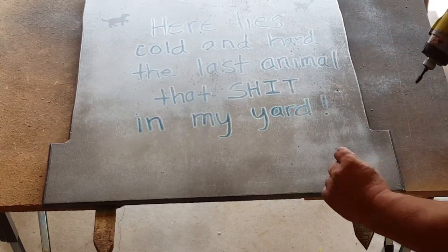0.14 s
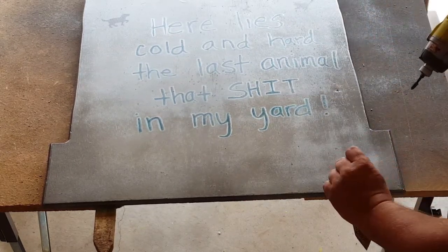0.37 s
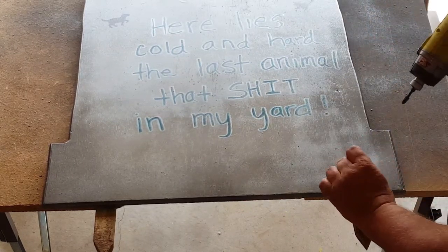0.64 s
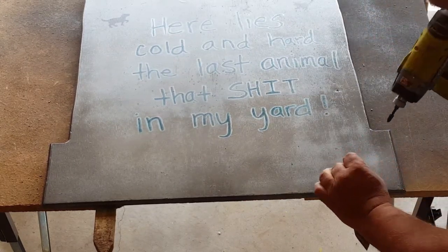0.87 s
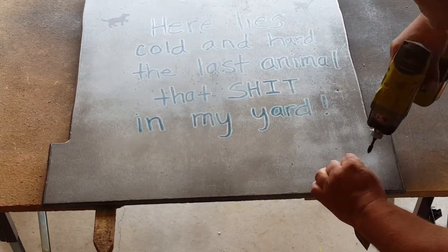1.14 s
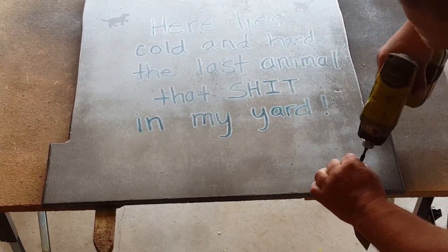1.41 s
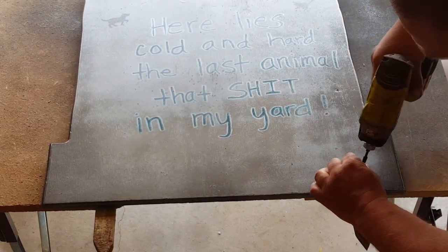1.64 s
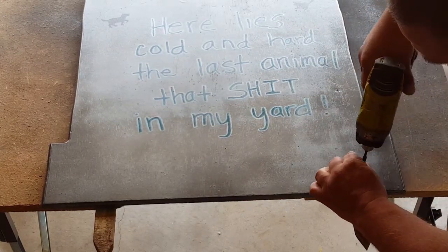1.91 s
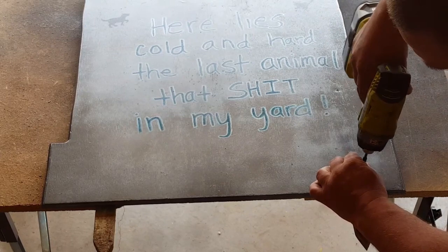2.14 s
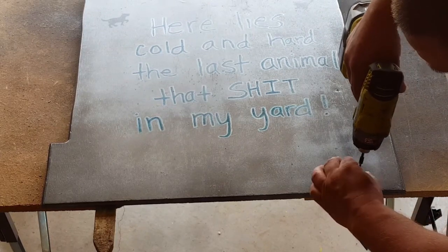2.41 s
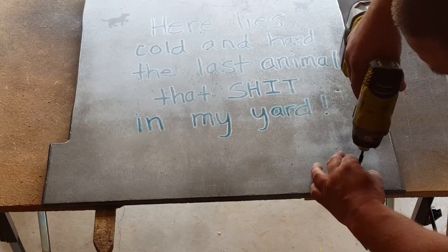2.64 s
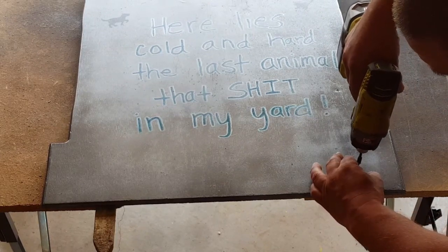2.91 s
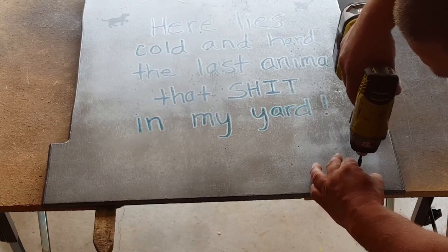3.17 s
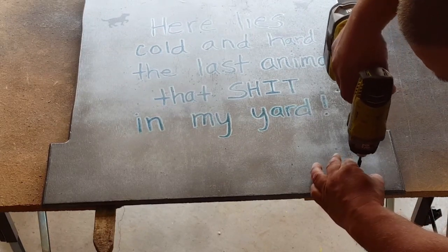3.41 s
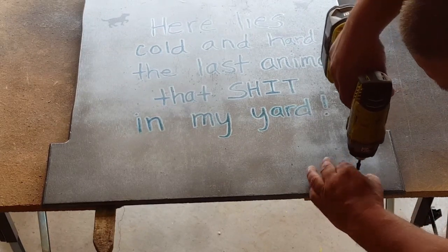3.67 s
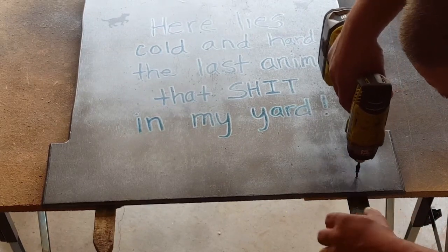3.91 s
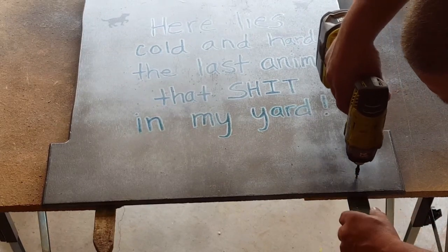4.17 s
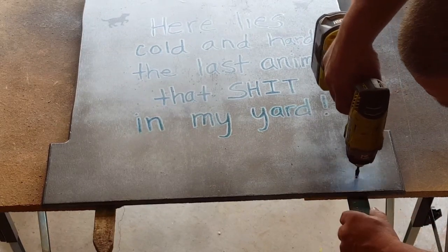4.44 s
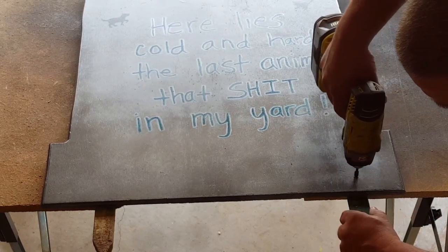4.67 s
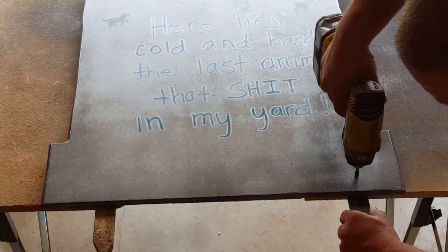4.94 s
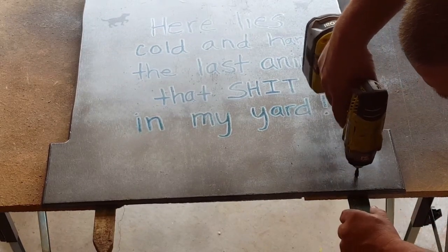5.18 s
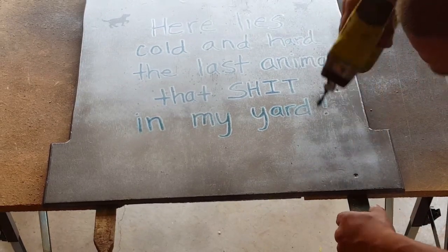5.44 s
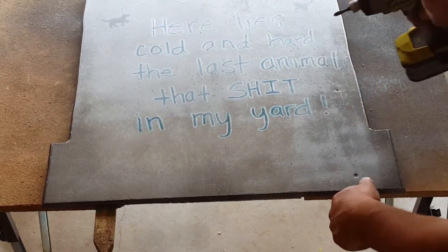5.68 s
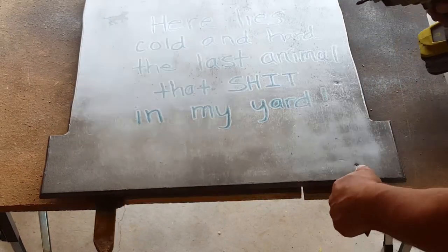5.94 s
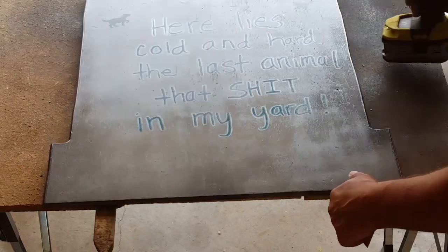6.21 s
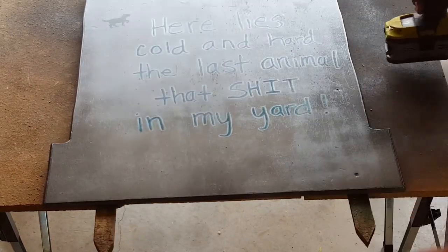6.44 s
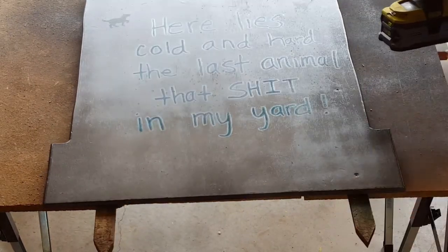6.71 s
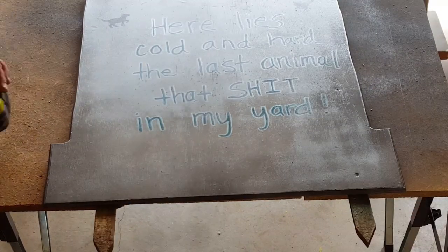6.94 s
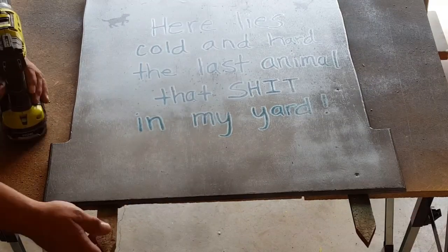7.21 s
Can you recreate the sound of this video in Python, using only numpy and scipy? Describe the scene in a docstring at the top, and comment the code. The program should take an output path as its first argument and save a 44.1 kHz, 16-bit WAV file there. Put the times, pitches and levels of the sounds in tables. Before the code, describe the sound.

Soft rubbing, small taps and muffled thumps on a board come first, over quiet room air and hum. Midway, a power driver pulses five times: three weak, whining spins, then two strong bites with rapid, bright hammer blows and woody thuds, the fifth the hardest. Wood drags and knocks against wood afterwards. Near microphone, short room tail, sudden end.

```python
"""Hands, board and stake knock, rub and tap in a small workshop, over air noise and a far machine's hum.
From 3.5 s a cordless driver (noise grains through spectra, plus a gear whine) runs five short bursts into plywood.
In the last two the screw bites and noise-burst blows ring the board's modes; a thin squeal precedes the fifth.
Then handling goes on: pushes and rattles through the same modes, grainy friction-like noise in smooth strokes.
A room tail of decaying noise surrounds the near sounds; all fades out at 6.93 s and silence follows."""
import sys
import numpy as np
from scipy import signal
from scipy.fft import rfft, irfft, next_fast_len
from scipy.io import wavfile
from scipy.ndimage import uniform_filter1d, map_coordinates

SR = 44100
rng = np.random.default_rng(int(sys.argv[2]) if len(sys.argv) > 2 else 0)


def digitize_waveform(pressure):
    """Quantize a signal to 16-bit integers and store it at the path in sys.argv[1].

    Rows of a 2-D input are taken as channels; values are limited to [-1, 1].
    """
    field = np.atleast_2d(pressure).T
    bounded = np.clip(field, -1, 1)
    quanta = np.round(bounded * 32767).astype(np.int16)
    wavfile.write(sys.argv[1], SR, quanta)


def gain_from_decibels(decibels):
    """Convert decibel values to linear amplitude factors."""
    exponent = np.asarray(decibels, float) / 20
    return 10 ** exponent


N = 323429

# gear and motor chatter spectrum: hz [Hz], density_db [dB per Hz, relative]
MOTOR_SPECTRUM = [(290, -44), (500, -13.5), (771, -10.5), (849, -10), (1350, -4.5), (1750, -2.5),
                  (2140, -2.5), (2360, -2), (5000, -14.5), (6500, -49), (11000, -120)]
# brush and fan hiss spectrum: hz [Hz], density_db [dB per Hz, relative]
HISS_SPECTRUM = [(1470, -32.5), (2500, -6.5), (3230, -5), (4170, -12.5), (4550, -17.5), (5150, -7.5),
                 (7300, -14), (9010, -13.5), (11400, -17), (16000, -25)]


def driver():
    """Gear teeth and brushes chatter; the planetary gears whine at a pitch that follows the speed."""
    motor_gain, hiss_gain, bite_gain, whine_hz = controls()
    uneven = gain_from_decibels(1.5 * drift(60) + 3.0 * drift(200))
    # each ear faces other vents of the housing, so the chatter differs left and right
    gears = coloured(grit(6000, spread_db=3.5, channels=2), MOTOR_SPECTRUM)
    hiss = coloured(grit(9000, spread_db=3.0, channels=2), HISS_SPECTRUM)

    # narrow noise carried on the whine
    wobble = signal.lfilter([1], [1, -.985], rng.standard_normal((2, 2, N)))
    phase = 2 * np.pi * np.cumsum(whine_hz) / SR
    whine = rms_one(wobble[0] * np.cos(phase) + wobble[1] * np.sin(phase))

    running = motor_gain * (gain_from_decibels(-2) * gears + gain_from_decibels(-11) * whine)
    housing = uneven * (running + hiss_gain * gain_from_decibels(1.5) * hiss)
    # the bit passes its chatter into the wood, the more the harder it bites
    chatter = grit(1500, spread_db=5.0) + 0.68 * grit(2200, spread_db=4.5, channels=2)
    wood = rms_one(board(band(band(chatter, 370, 1500), 270, 2500)))
    return housing + uneven * bite_gain * wood


# trigger pulls: full_speed_s [s], spin_up_s [s], run_s [s], motor_db [dB], swell_db [dB over the run],
# top_whine_hz [Hz], hiss_db [dB over motor]
PULLS = [(3.494, .018, .135, -45, 3, 2560, 0), (3.843, .055, .105, -37, -2.5, 2230, -7),
         (4.18, .058, .085, -40.5, 3, 2250, -2.5), (4.53, .048, .09, -26, 0, 2150, -5),
         (5.09, .027, .07, -21, 0, 2330, -4)]
# screw seats, motor labours: full_load_s [s], build_s [s], length_s [s], motor_db [dB], swell_db [dB]
LOADS = [(4.61, .042, .022, -16.5, -3), (5.115, .042, .068, -16.5, -1.5)]


def controls():
    """Gains of motor, hiss and board and the whine pitch: speed sets the pitch, load adds to all gains."""
    coast_s, load_coast_s = .065, .05   # time to lose 20 dB
    hiss_fade_db_per_s = 140   # the hiss comes later and dies sooner
    free_bite_db, loaded_bite_db = -6.5, 0   # board over motor
    bite_lag_db_per_s = 200   # the bit grips only near full speed
    whine_sag = .08   # share of pitch lost as the speed drops away
    t = np.arange(N) / SR
    free, hiss, grip, speed = 0, 0, 0, 0
    for full_speed_s, spin_up_s, run_s, motor_db, swell_db, _, hiss_db in PULLS:
        level_db = stroke_db(full_speed_s, spin_up_s, run_s, coast_s, motor_db, swell_db, order=2)
        before_s = np.maximum(full_speed_s - t, 0)
        after_s = np.maximum(t - full_speed_s - run_s, 0)
        free = free + gain_from_decibels(level_db)
        grip = grip + gain_from_decibels(level_db + free_bite_db - bite_lag_db_per_s * before_s)
        half_swell_db = swell_db * np.clip((t - full_speed_s) / run_s, 0, 1) / 2
        fade_db = hiss_fade_db_per_s * (2 * before_s + after_s)
        hiss = hiss + gain_from_decibels(level_db - half_swell_db + hiss_db - fade_db)
        speed = np.maximum(speed, gain_from_decibels(stroke_db(full_speed_s, spin_up_s, run_s, coast_s, 0)))

    loaded = 0
    for full_load_s, build_s, length_s, motor_db, swell_db in LOADS:
        loaded = loaded + gain_from_decibels(stroke_db(full_load_s, build_s, length_s, load_coast_s,
                                        motor_db, swell_db, order=2))

    # each pull's pitch applies from two spin-up times before full speed
    starts_s, top_whine_hz = np.array([(p[0] - 2 * p[1], p[5]) for p in PULLS]).T
    pull_index = np.maximum(np.searchsorted(starts_s, t) - 1, 0)
    whine_hz = top_whine_hz[pull_index] * (1 - whine_sag * (1 - speed))
    return free + loaded, hiss + gain_from_decibels(-8) * loaded, grip + gain_from_decibels(loaded_bite_db) * loaded, whine_hz


# hammer blows and trigger clicks inside the driver: start_s [s], level_db [dB]
BLOWS = [(3.4962, -25), (4.5035, -30), (4.5947, -3), (4.6161, -11), (4.6357, -13.5), (5.0806, -14),
         (5.0955, -15), (5.1176, 4), (5.1313, -11), (5.1531, -1), (5.1691, -6)]


def blows():
    """Each blow is a bright crack of the anvil and a shove into the board, with a deep jolt through the trestles."""
    shove_over_crack_db = 10
    crack, shove = np.zeros(N), np.zeros(N)
    for start_s, level_db in BLOWS:
        i = round(start_s * SR)
        crack[i:i + SR // 10] += gain_from_decibels(level_db + 0.5) * burst(0.00092)
        shove[i:i + SR // 10] += gain_from_decibels(level_db + shove_over_crack_db) * burst(.004)
    jolt = gain_from_decibels(-3) * band(shove, 60, 170)
    return band(crack, 1800, 15000) + board(band(shove, 280, 1700)) + jolt


# plywood modes: mode_hz [Hz], width_hz [Hz], level_db [dB]
BOARD_MODES = [(67, 15, -4.5), (113.3, 20, 5.5), (159.6, 35, 6.5), (200, 23, 2), (231, 13, 6.5),
               (283, 90, 3), (346, 26, 2.5), (399.6, 19, 3.5), (530, 32, -1.5), (705, 64, 3.5),
               (792.4, 47, 1), (917, 56, 3.5), (1058.5, 57, 1.5), (1254, 50, 5.5), (1425, 93, -3),
               (1623, 100, -4.5), (1840, 120, -1.5), (2250, 73, 1), (2720, 140, -9)]


def board(force, between_db=-8):
    """The plywood: its modes in parallel, over a bed of the many small modes between them."""
    modes = 0
    for k, (mode_hz, width_hz, level_db) in enumerate(BOARD_MODES):
        modes = modes + (-1) ** k * gain_from_decibels(level_db) * resonance(force, mode_hz, width_hz)
    return modes + gain_from_decibels(between_db) * band(force, 76, 3200)


# motor control squeals before the shaft turns: start_s [s], end_s [s], pitch_hz [Hz], level_db [dB]
SQUEALS = [(5.031, 5.07, 6240, -56.5)]


def squeal():
    """The motor control sings: a thin tone of wavering level and phase swells in 20 ms and stops."""
    t, out = np.arange(N) / SR, 0
    for start_s, end_s, pitch_hz, level_db in SQUEALS:
        swell = np.clip((t - start_s) / .02, 0, 1) * (t < end_s)
        tone = np.sin(2 * np.pi * pitch_hz * t + drift(200))
        out = out + gain_from_decibels(level_db + 3 * drift(150)) * swell * tone
    return out


def knocks():
    """A knock is a soft low push, a woody thud, a harder clack and a bright tick."""
    push, thud, clack, tick = np.zeros((4, N))
    t = np.arange(SR // 10) / SR
    for start_s, push_db, thud_db, clack_db, tick_db in contacts():
        i = round(start_s * SR)
        rattle = rms_one(burst(.009)) / 9
        push[i:i + SR // 10] += gain_from_decibels(push_db + 16) * np.sin(np.pi * np.minimum(t / .004, 1)) ** 2
        thud[i:i + SR // 10] += gain_from_decibels(thud_db + 28.5) * rattle
        clack[i:i + SR // 10] += gain_from_decibels(clack_db + 24) * rattle
        tick[i:i + SR // 10] += gain_from_decibels(tick_db + 6) * rattle
    hard = band(band(thud, 300, 750), 200, 1100) + band(band(clack, 650, 1900), 550, 2400)
    # wood on wood dulls towards the top
    tick = signal.lfilter([.3], [1, -.7], band(tick, 2400, 15000))
    # a slow push reaches only the few lowest modes, which ring on
    return board(band(push, 45, 450), between_db=-23) + board(hard, between_db=-3.0) + tick


# heel of a hand or stake bumps the board: start_s [s], push_db [dB]
THUMPS = [(0.592, -56), (0.772, -53), (2.46, -39), (2.499, -43), (2.828, -36), (2.884, -52), (3.048, -51),
          (3.242, -42), (3.289, -54)]
# wood on wood: start_s [s], thud_db [dB], clack_over_thud_db [dB]
WOOD_KNOCKS = [(0.75, -62, 12), (0.794, -46, -12), (1.641, -43, 2), (2.659, -50, -14), (3.96, -39, -10),
               (6.057, -36, -19), (6.196, -29, 5), (6.202, -26, -4), (6.251, -40, 0), (6.314, -34, -3),
               (6.449, -51, -9), (6.588, -44, -12), (6.724, -45, -20)]
# steel bit touches screw or board: start_s [s], clack_db [dB], thud_over_clack_db [dB]
TAPS = [(0.055, -58, 0), (1.49, -41, -7), (1.498, -43, -2), (1.529, -44, 4), (1.961, -28, -11),
        (1.975, -46, -5), (2.144, -44, 0)]


def contacts():
    """All hits as (start_s, push_db, thud_db, clack_db, tick_db); each kind has its own balance."""
    hits = []
    for start_s, push_db in THUMPS:
        hits.append((start_s, push_db, push_db - 9, push_db - 19, push_db - 24))
    for start_s, thud_db, over_db in WOOD_KNOCKS:
        clack_db = thud_db + over_db
        hits.append((start_s, thud_db - 15, thud_db, clack_db, clack_db - 22))
    for start_s, clack_db, over_db in TAPS:
        thud_db = clack_db + over_db
        hits.append((start_s, thud_db - 16, thud_db, clack_db, clack_db - 8))
    return hits


# brushing, rattles after hits and dull tails, as friction-like noise: strongest_s [s],
# rise_s [s per 20 dB], fall_s [s per 20 dB], mid_db [dB], treble_over_mid_db [dB]
STROKES = [(.062, .02, .1, -63, 4), (.155, .05, .12, -62, 1), (.29, .15, .15, -52, -5),
           (.38, .15, .13, -51, -9), (.645, .05, .06, -61, -4), (.85, .1, .1, -60, -7),
           (1.105, .04, .08, -62, 1), (1.23, .04, .08, -59, -4), (1.5, .015, .25, -51, -9),
           (1.78, .2, .08, -70, -1), (1.968, .005, .13, -43, -10), (2.15, .012, .08, -54, -7),
           (2.22, .05, .1, -62, -3), (2.43, .05, .1, -62, -10), (2.69, .08, .25, -60, -3),
           (3.345, .08, .2, -58, -8), (3.475, .04, .05, -57, -7), (3.73, .05, .1, -50, -20),
           (3.79, .04, .1, -51, -7), (4.09, .04, .08, -61, -2), (4.135, .02, .05, -54, -8),
           (4.44, .1, .05, -66, -3), (5.045, .08, .05, -62, -3), (5.6, .025, .09, -49, -35),
           (5.66, .02, .04, -66, 2), (5.72, .02, .08, -48, -18), (5.785, .06, .04, -60, -4),
           (6.203, .008, .09, -40, -30), (6.25, .05, .1, -54, -14), (6.45, .05, .2, -63, -9),
           (6.86, .1, .1, -70, -1)]
# wood drags on wood: strongest_s [s], rise_s [s per 20 dB], fall_s [s per 20 dB], level_db [dB]
DRAGS = [(.36, .3, .3, -59), (.62, .05, .04, -60), (.8, .06, .3, -51), (1.51, .05, .25, -49),
         (2.14, .1, .3, -58), (2.43, .06, .2, -58), (3.0, .5, .5, -60), (3.37, .12, .3, -53),
         (3.77, .15, .15, -52), (4.11, .1, .1, -55), (5.6, .05, .1, -59), (5.75, .1, .1, -65),
         (6.192, .02, .1, -44), (6.33, .15, .15, -47), (6.56, .2, .2, -54), (6.88, .2, .2, -56)]
# friction grain spectrum: hz [Hz], density_db [dB per Hz, relative]
RUB_SPECTRUM = [(470, -41), (800, -9), (978, -12.5), (1660, -1.5), (2840, -5.5), (4570, -12.5), (6250, -15),
                (12100, -23.5), (16000, -25.5)]


def rubbing():
    """Friction-like grains for brushing, rattles and dull tails; the board carries the low drags."""
    rustle_db, rustle_treble_db, shuffle_db = -74, -8, -71   # faint handling between the strokes
    rustle = gain_from_decibels(rustle_db + 3.0 * drift(6))
    mid_gain, treble_gain = rustle, gain_from_decibels(rustle_treble_db) * rustle
    for strongest_s, rise_s, fall_s, mid_db, treble_over_mid_db in STROKES:
        stroke = gain_from_decibels(stroke_db(strongest_s, rise_s, 0, fall_s, mid_db))
        mid_gain = mid_gain + stroke
        treble_gain = treble_gain + stroke * gain_from_decibels(treble_over_mid_db)
    low_gain = gain_from_decibels(shuffle_db + 3.0 * drift(5))
    for strongest_s, rise_s, fall_s, level_db in DRAGS:
        low_gain = low_gain + gain_from_decibels(stroke_db(strongest_s, rise_s, 0, fall_s, level_db))

    grains = coloured(grit(5600, spread_db=3.5, channels=2), RUB_SPECTRUM)
    mids = signal.sosfilt(signal.butter(3, 4000, fs=SR, output="sos"), grains)
    mids = mids + gain_from_decibels(-1) * resonance(grains, 2570, 703)   # the cupped hand favours one band
    treble = signal.sosfilt(signal.butter(3, 4000, "high", fs=SR, output="sos"), grains)
    lows = rms_one(board(band(grit(600, spread_db=4.0), 73, 600)))
    return low_gain * lows + mid_gain * rms_one(mids) + treble_gain * gain_from_decibels(4.5) * rms_one(treble)


# unlike short all-pass delays: one row per ear, delay_s [s]
EAR_DELAYS_S = [(.0007, .0019, .0031), (.0011, .0016, .0037)]


def spread(x, echo=0.33):
    """The board is a wide source: above the bass each ear gets the blow smeared by its own all-pass delays."""
    low = signal.sosfilt(signal.butter(1, 450, fs=SR, output="sos"), x)
    ears = []
    for delays_s in EAR_DELAYS_S:
        high = x - low + 1e-18
        for delay_s in delays_s:
            taps = np.zeros(round(delay_s * SR) + 1)
            taps[0], taps[-1] = 1, echo
            response = signal.lfilter(taps[::-1], taps, np.arange(SR // 20) == 0)
            high = signal.oaconvolve(high, response)[:N]
        ears.append(low + high)
    return np.array(ears)


# reverberation time: hz [Hz], t60_s [s]
ROOM_T60 = [(60, 1), (250, 0.51), (1000, 0.33), (4000, 0.32), (12000, 0.21)]


def room(x):
    """Dense reflections, octave by octave dying at their own rate; the two ears differ more in the treble."""
    t, tail = np.arange(SR) / SR, 0
    for low_hz in 40 * 2. ** np.arange(9):
        mid, side = band(rng.standard_normal((2, SR)), low_hz, 2 * low_hz)
        apart = np.clip(0.57 + (low_hz / 900) ** 1.5, 0, 1)
        decay_db = -60 * t / at_hz(ROOM_T60, 1.8 * low_hz)
        bass_cut_db = 3.8 * (low_hz < 300)
        tail = tail + (mid + apart * side * [[1], [-1]]) * gain_from_decibels(decay_db - bass_cut_db)
    tail = tail * np.clip((t - .002) / .007, 0, 1)   # the first walls answer after a few ms
    return signal.fftconvolve(x, tail / np.sqrt(np.sum(tail ** 2) / 2), axes=1)[:, :N]


# workshop air spectrum: hz [Hz], density_db [dB per Hz, relative]
AIR_SPECTRUM = [(12, -26.5), (20, -9), (44, -5.5), (127, -2.5), (241, -3), (347, -11), (410, -5.5),
                (459, -10.5), (590, -11), (2750, -21), (7520, -35.5), (13900, -38.5), (16000, -41.5)]
# left-right likeness that splits the air into mid and side: hz [Hz], likeness [-1 to 1]
LIKENESS = [(60, 0.23), (240, 0.93), (950, 0.22), (3770, -0.26), (15000, -0.03)]
# far machine: pitch_hz [Hz], level_db [dB, relative]
HUM = [(118.4, -62), (242.2, -76), (349.9, -78), (403.7, -66)]


def background():
    """Workshop air, most alike in both ears around 240 Hz, with the wavering hum of a machine."""
    mid_spectrum, side_spectrum = [], []
    for hz, density_db in AIR_SPECTRUM:
        likeness = np.clip(at_hz(LIKENESS, hz), 0, .98)
        mid_spectrum.append((hz, density_db + 10 * np.log10(1 + likeness)))
        side_spectrum.append((hz, density_db + 10 * np.log10(1 - likeness)))
    mid, side = rng.standard_normal((2, N))
    mid, side = coloured(mid, mid_spectrum), coloured(side, side_spectrum)
    air = gain_from_decibels(-58) * (mid + gain_from_decibels(-3.5) * side * [[1], [-1]])

    # the rumble heaves, the hiss stays more even
    bass = signal.sosfilt(signal.butter(1, 400, fs=SR, output="sos"), air)
    air = gain_from_decibels(3.5 * drift(9)) * bass + gain_from_decibels(1.2 * drift(5)) * (air - bass)

    t, hum = np.arange(N) / SR, 0
    for pitch_hz, level_db in HUM:
        tone = np.sin(2 * np.pi * pitch_hz * t + .8 * drift(2.6))
        hum = hum + gain_from_decibels(level_db + 2 + 0.83 * drift(3)) * tone
    return air + hum


def stroke_db(s, rise_s, hold_s, fall_s, db, swell_db=0, order=1):
    """Level in time: climbs its last 20 dB in rise_s, holds from s while it swells, drops 20 dB in fall_s."""
    t = np.arange(N) / SR - s
    held_db = swell_db * np.clip(t / max(hold_s, 1e-3), 0, 1)
    rise_db = 20 * (np.maximum(-t, 0) / rise_s) ** order   # order 2 eases in
    fall_db = 20 * np.maximum(t - hold_s, 0) / fall_s
    return db + held_db - rise_db - fall_db


def burst(length_s):
    """A tenth of a second of noise that dies quickly; its top is near 1."""
    t = np.arange(SR // 10) / SR
    attack = np.minimum(t / 0.00015, 1)
    return rng.standard_normal(len(t)) * np.exp(-t / max(length_s, 1e-4)) * attack / 2


def grit(per_s, spread_db, channels=1):
    """Dense tiny impacts of uneven size; rms 1."""
    size_db = spread_db * np.minimum(rng.exponential(1, (channels, N)), 4)
    sizes = gain_from_decibels(size_db) * rng.choice([-1, 1], (channels, N))
    return rms_one(sizes * (rng.random((channels, N)) < per_s / SR))


def drift(rate_hz):
    """Slow chance: a smooth curve through about rate_hz normal random knots a second."""
    knots = rng.standard_normal(int(N / SR * rate_hz) + 3)
    return map_coordinates(knots, [np.arange(N) / SR * rate_hz], order=3)


def resonance(x, hz, width_hz):
    """Two-pole peak with gain near 1 on top."""
    r = np.exp(-np.pi * width_hz / SR)
    poles = [1, -2 * r * np.cos(2 * np.pi * hz / SR), r * r]
    return signal.lfilter([(1 - r * r) / 2, 0, (r * r - 1) / 2], poles, x + 1e-18)


def band(x, low_hz, high_hz):
    """Band-pass with second-order slopes."""
    edges_hz = [low_hz, min(high_hz, .45 * SR)]
    return signal.sosfilt(signal.butter(2, edges_hz, "band", fs=SR, output="sos"), x)


def coloured(x, spectrum):
    """Shape a steady noise by a spectrum; rms 1."""
    size = next_fast_len(N)
    hz = np.maximum(np.arange(size // 2 + 1) * SR / size, 1)
    return rms_one(irfft(rfft(x, size) * gain_from_decibels(at_hz(spectrum, hz)), size)[..., :N])


def at_hz(points, hz):
    """Read a spectrum table on a log frequency axis."""
    table_hz, values = np.array(points).T
    return np.interp(np.log(hz), np.log(table_hz), values)


def rms_one(x):
    """Scale to unit power."""
    return x / np.sqrt(np.mean(x ** 2) + 1e-20)


def scene():
    """Near sources over both ears, then the rubbing, the room and its air."""
    balance = gain_from_decibels(np.array([[.3], [-.3]]))   # left, right
    near = (driver() + spread(blows() + knocks() + squeal())) * balance
    rub = rubbing()
    reflections = gain_from_decibels(-4) * room(near + gain_from_decibels(-3) * rub)
    return gain_from_decibels(-1.5) * near + rub + reflections + background()


def band_limit(x):
    """A steep low-pass at the top of the band."""
    return signal.sosfilt(signal.butter(12, 16180, fs=SR, output="sos"), x)


# gain control: threshold_db [dB], share of the excess taken off [ratio], recovery_db_per_s [dB/s]
GAIN_CONTROL = (-28.5, 0.17, 3)


def record(dry):
    """Loud passages pull the gain down and it creeps back; the top is cut; the sound fades out before the end."""
    threshold_db, share, recovery_db_per_s = GAIN_CONTROL
    fade_start_s, fade_length_s = 6.93, 0.012
    t = np.arange(N) / SR
    level_db = 10 * np.log10(uniform_filter1d(np.mean(dry ** 2, axis=0), size=2000) + 1e-12)
    cut_db = share * np.maximum(level_db - threshold_db, 0)
    # hold the deepest cut, less the recovery since
    recovered_db = recovery_db_per_s * t
    cut_db = np.maximum(np.maximum.accumulate(cut_db + recovered_db) - recovered_db, 0)
    lag = np.exp(-1 / (.06 * SR))   # 60 ms smoothing
    wet = dry * gain_from_decibels(-signal.lfilter([1 - lag], [1, -lag], cut_db))
    wet = signal.sosfilt(signal.cheby2(10, 60, 16600, fs=SR, output="sos"), np.clip(wet, -1, 1))
    fade = np.clip((fade_start_s + fade_length_s - t) / fade_length_s, 0, 1) ** 2
    return band_limit(wet * fade)


dry = scene()
out = record(dry)
digitize_waveform(out)
```